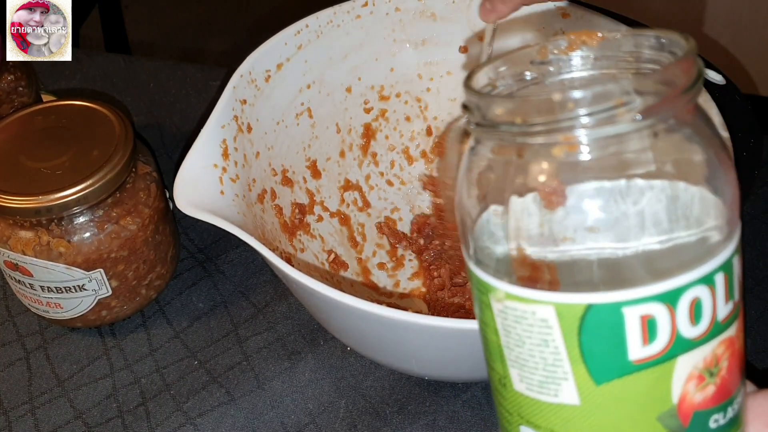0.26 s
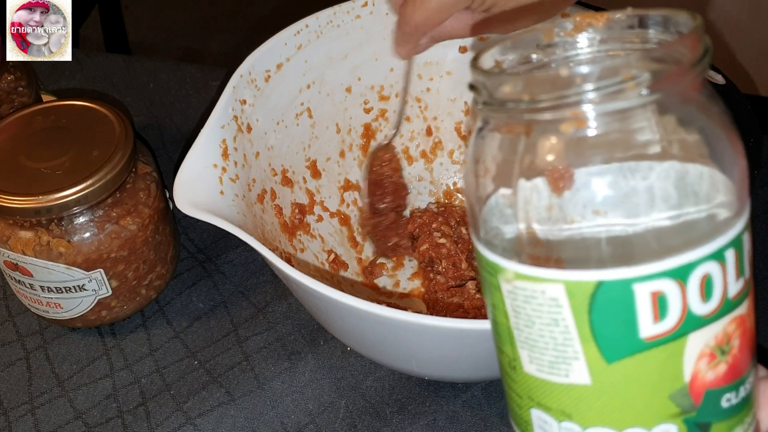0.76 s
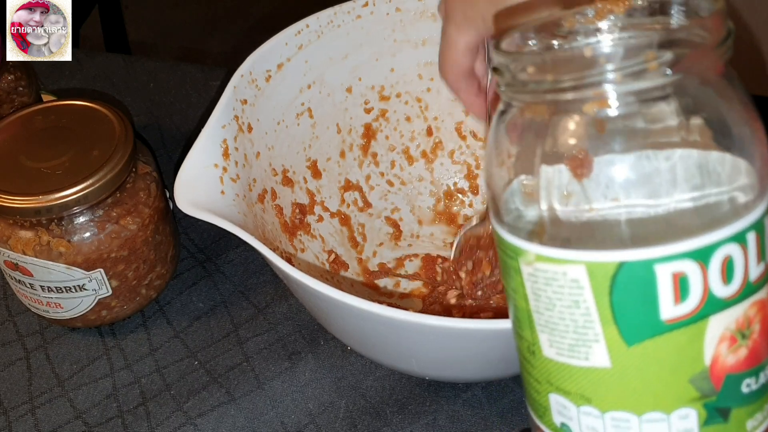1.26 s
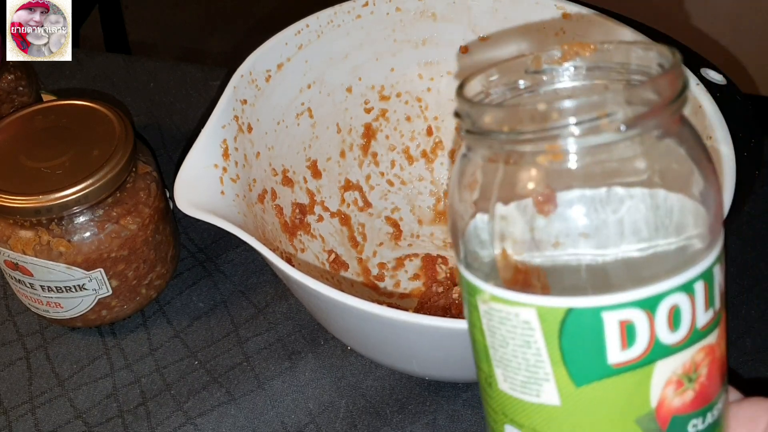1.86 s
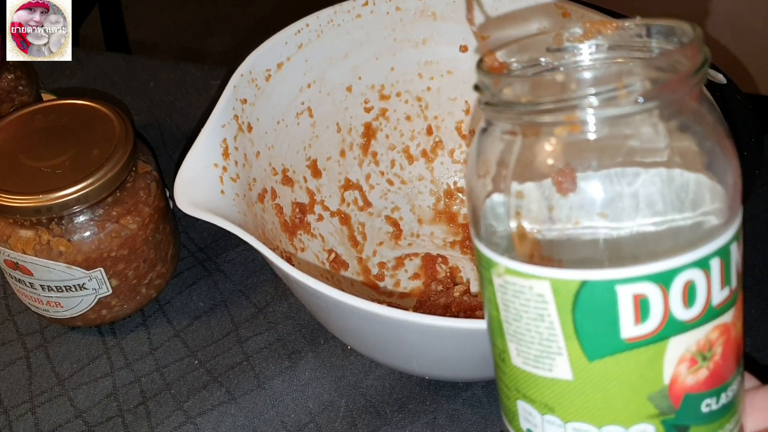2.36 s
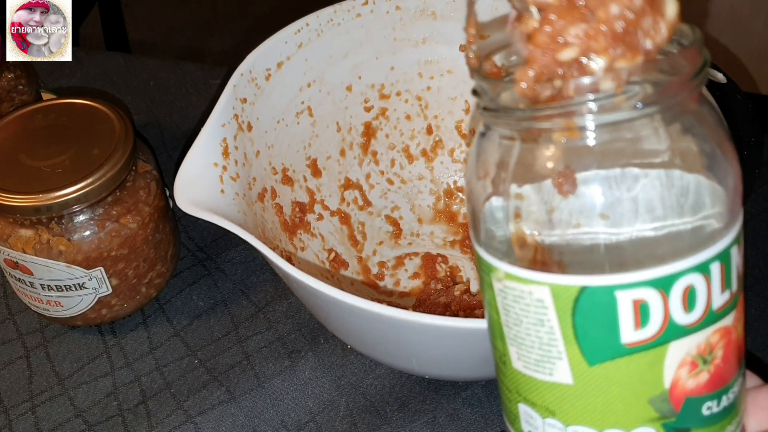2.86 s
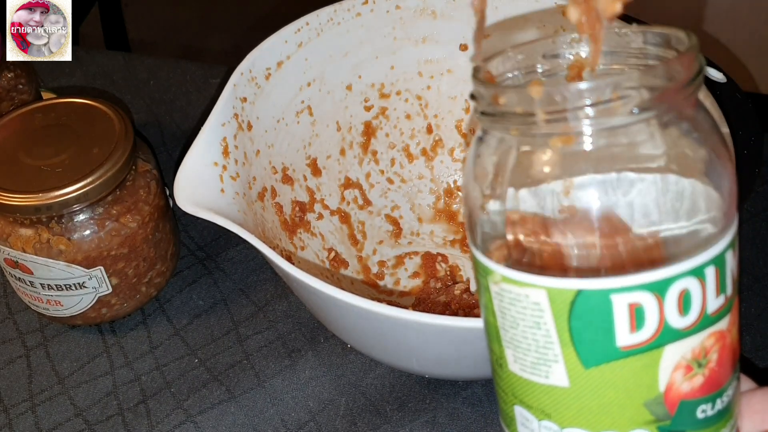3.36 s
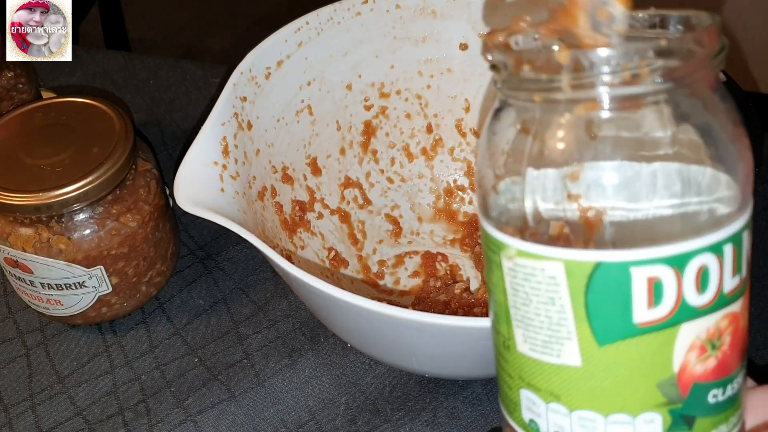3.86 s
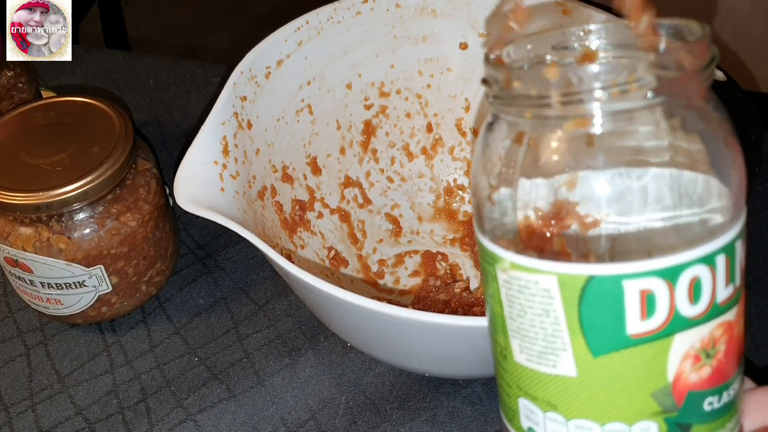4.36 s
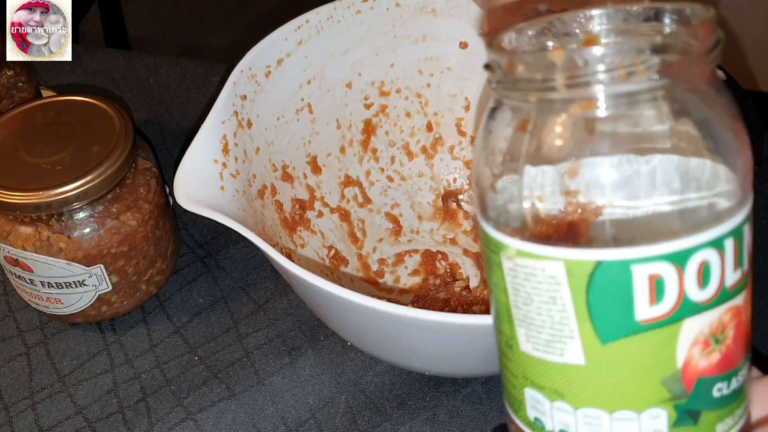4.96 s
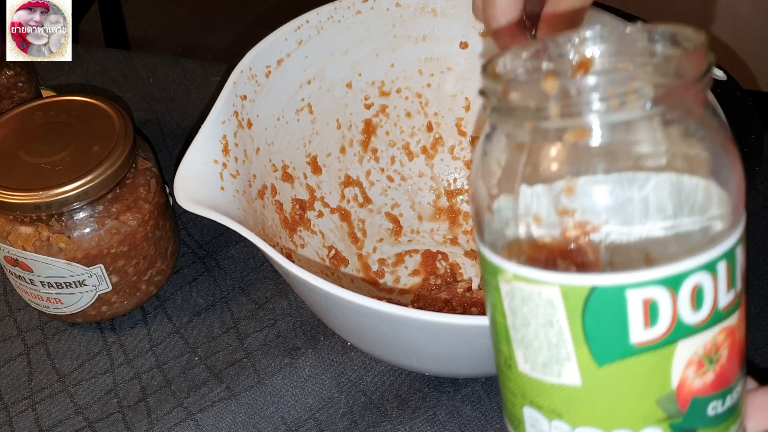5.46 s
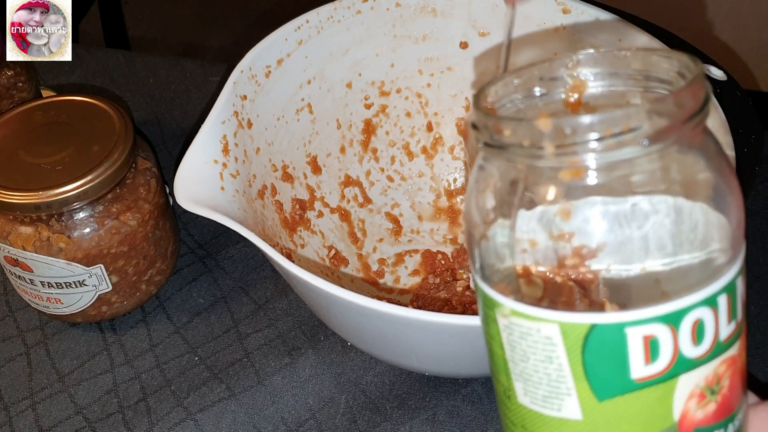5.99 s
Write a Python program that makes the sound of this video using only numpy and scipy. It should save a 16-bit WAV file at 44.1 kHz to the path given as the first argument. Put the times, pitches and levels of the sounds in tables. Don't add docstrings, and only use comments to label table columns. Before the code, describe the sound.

Close up in a small kitchen, faint hiss and low fridge hum continue throughout. A steel spoon barely touches a plastic bowl, then knocks hard and drags through wet sauce with a gritty, hollow scrape and a lighter return. After a quiet gap with tiny wet ticks, two bright clinks ring on a glass jar. Another hard knock and scrape follows, fading into soft touches. A close stereo phone microphone catches a short room echo.

```python
import sys
import numpy as np
from scipy import signal
from scipy.fft import rfft, irfft, next_fast_len
from scipy.io import wavfile
from scipy.ndimage import uniform_filter1d

SR = 44100
rng = np.random.default_rng(int(sys.argv[2]) if len(sys.argv) > 2 else 0)


def pcm_store(signal):
    levels = np.round(np.clip(np.atleast_2d(signal), -1, 1) * 32767)
    wavfile.write(sys.argv[1], SR, levels.astype(np.int16).T)


def to_linear_factor(level_db):
    exponent = np.asarray(level_db, float) / 20
    return 10 ** exponent


N = 274743


def evened(x):
    return x / np.sqrt(np.mean(x ** 2) + 1e-20)


def steady(x):
    return x / np.sqrt(uniform_filter1d((x ** 2).mean(0), 6000) + 1e-20)


def read(points, hz):
    f, value = np.transpose(points)
    return np.interp(np.log(hz + 1), np.log(f + 1), value)


def add(mix, s, sound):
    part = mix[round(s * SR):][:len(sound)]
    part += sound[:len(part)]


def slow(hz, size=16):
    coarse = signal.lfilter(*signal.butter(2, hz, fs=SR / size), rng.standard_normal(N // size + 2))
    return np.repeat(evened(coarse), size)[:N]


def body(x, modes, focus_hz=None, octaves=1., patchy_db=0.):
    out = np.zeros(x.shape)
    focus = None if focus_hz is None else np.log2(focus_hz)
    for k, (hz, width_hz, db) in enumerate(modes):
        near = 1
        if focus is not None:
            near = to_linear_factor(patchy_db * slow(8.4)) / (1 + ((focus - np.log2(hz)) / octaves) ** 2)
        r = np.exp(-np.pi * width_hz / SR)
        top = (-1) ** k * to_linear_factor(db) * np.sqrt(1 - r) * np.array([1, 0, -1])
        bottom = [1, -2 * r * np.cos(2 * np.pi * hz / SR), r * r]
        out += signal.lfilter(top, bottom, x * near)
    return out


def causal(colour, size=2048):
    hz = abs(np.fft.fftfreq(size, 1 / SR))
    log_gain = np.log(to_linear_factor(np.maximum(read(colour, hz), -70)))
    return np.fft.ifft(np.exp(np.conj(signal.hilbert(log_gain)))).real[:size // 2]


def click(colour):
    pulse = causal(colour)
    return pulse / abs(pulse).max()


# pitch_hz, likeness (-1 to 1)
LIKENESS = [(100, 0.5), (300, 1), (600, 0.3), (1100, 0.2), (3000, -0.13), (12000, 0.3)]


def liken(pair):
    size = next_fast_len(pair.shape[1], True)
    a, b = rfft(pair, size)
    same = np.clip(read(LIKENESS, np.fft.rfftfreq(size, 1 / SR)), -1, 1)
    return irfft(np.array([a, same * a + np.sqrt(1 - same ** 2) * b]), size)[:, :pair.shape[1]]


# multiple, level_db (rms)
HUM_ORDERS = [(1, -76), (2, -72), (3, -88.5), (4, -84), (5, -84.5), (6, -91), (10, -100.5), (12, -99),
              (15, -104.5), (16, -95), (18, -95.5)]
# start_s, second_order_db (rms)
LABOUR = [(0.0, -71.5), (0.71, -71), (0.85, -63), (1.3, -65.5), (1.44, -70.5), (1.79, -74), (1.91, -73.5),
          (2.6, -75), (2.88, -71), (3.19, -71.5), (3.38, -73), (4.34, -70), (4.63, -72), (5.0, -67.5),
          (5.73, -73), (6.23, -70)]


def fridge():
    turn_hz, waver_db = 48.9, 1.5
    t = np.arange(N) / SR
    load_db = np.interp(t, *np.transpose(LABOUR)) - HUM_ORDERS[1][1]
    hum = np.zeros(N)
    for k, db in HUM_ORDERS:
        gain = to_linear_factor(db + 3.5 + load_db + waver_db * slow(4.5))
        hum += gain * np.sin(2 * np.pi * (k * turn_hz * t + rng.random()))
    return hum * to_linear_factor(np.array([[-.5], [.5]]))


# middle_s, half_length_s, level_db
GRIPS = [(0.043, 0.34, -71.5), (1.467, 0.17, -80.5), (2.302, 0.15, -88.5), (4.099, 0.3, -78.5),
         (4.441, 0.1378, -72.5), (6.048, 0.17, -70.5)]


def grip(t):
    return sum(to_linear_factor(db) * np.exp(-((t - s) / half_s) ** 2) for s, half_s, db in GRIPS)


# pitch_hz, level_db (per Hz)
AIR = [(18, -40.5), (30, -11), (103, -8.5), (144, -12), (250, -13), (412, -21.5), (880, -22), (1370, -30),
       (2510, -25), (4020, -31), (4830, -29), (7540, -40.5), (8600, -37.5), (9800, -42), (15700, -43.5)]
# pitch_hz, width_hz, level_db
HISS_LIFTS = [(2468, 550, 0), (5010, 390, 6), (8570, 600, 5.5), (12820, 1700, 4.5)]
# start_s, rumble_db
LOAD = [(0, 2.5), (.45, 0.5), (.8, 7), (1.5, 3), (1.9, -2.5), (2.3, 3.5), (2.55, -5.5), (2.9, 4), (3.6, -2),
        (4.2, 6), (5.8, 0), (6.23, 1.5)]
# pitch_hz, width_hz, level_db
HAND = [(320, 6.7, -6), (244, 27, -6)]


def air():
    air_db, rustle_db, still_hiss_db = -75.5, -75, -2.5
    frames, hz = N // 256 + 5, np.fft.rfftfreq(1024, 1 / SR)[:, None]
    a, b, c, d, patches = rng.standard_normal((frames, 513, 5)).T
    patches = evened(uniform_filter1d(uniform_filter1d(patches, 8, 0), 20, 1))
    t = np.arange(frames) * 256 / SR
    bass = 1 / (1 + (hz / 250) ** 4)
    rumble_db = np.interp(t, *np.transpose(LOAD))
    hiss_db = still_hiss_db + 2.0 * np.tanh(grip(t) / to_linear_factor(rustle_db))
    drift_db = bass * rumble_db + (1 - bass) * hiss_db
    lift_db = sum(db / (1 + (2 * (hz - f) / w) ** 2) for f, w, db in HISS_LIFTS)
    gain = to_linear_factor(read(AIR, hz) + lift_db + (1.73 + 1.8 * bass) * patches + drift_db)
    z = np.array([a + 1j * b, c + 1j * d]) * gain
    hiss = to_linear_factor(air_db + 5.5) * evened(signal.istft(z, nperseg=1024, noverlap=768)[1][:, :N])
    hand = grip(np.arange(N) / SR) * evened(body(rng.standard_normal((2, N)), HAND))
    return liken(hiss + hand)


# start_s, pressure_db, speed_db (rasp rel), wall_hz (contact height as favoured mode)
STROKES = [
    [(0.71, -28.5, -0.5, 537), (0.74, -39, -4.5, 610), (0.832, -45, 1.5, 560), (0.894, -41.5, -4, 422),
     (0.912, -33.5, -5, 410), (0.964, -48.5, 2, 512), (1.045, -52, -10.5, 535)],
    [(1.05, -49.5, -3.5, 500), (1.098, -45, -16, 544), (1.128, -65, 1, 533), (1.155, -47, -3, 530),
     (1.187, -42.5, -12.5, 503), (1.249, -65, -13, 500), (1.281, -61, -6, 545), (1.335, -78, 6, 570)],
    [(4.849, -29, -2, 497), (4.867, -47, 1.5, 510), (4.927, -47, 1, 630), (4.981, -46.5, 4.5, 483),
     (5.059, -65, -11, 525), (5.095, -57, 1, 464)],
    [(5.102, -55, -3.5, 530), (5.184, -51, -5, 547), (5.214, -53.5, 1, 497), (5.232, -43.5, -16, 456),
     (5.27, -66, 8.5, 510), (5.33, -53, 0, 494), (5.4, -56.5, 0.5, 455), (5.49, -97, -11, 416)],
]
# rim_start_hz, rim_end_hz, sauce_start_db, sauce_end_db, wall_spread_octaves
TRAVEL = [(2200, 1900, -2, -19, 1), (1300, 1850, -7, -23, 0.29), (1880, 1320, -11.5, -8.5, 0.66),
          (1530, 1900, -9.5, -14, 0.22)]
# start_s, length_s, pressure_db, speed_db, wall_hz
TOUCHES = [(0.048, 0.22, -69.5, -4, 400), (0.422, 0.079, -70.5, -5, 325), (1.357, 0.18, -64, -8, 320),
           (3.582, 0.097, -70.5, -18, 313.4), (4.734, 0.11, -76, 4, 321), (4.818, 0.029, -59, 0.5, 329),
           (5.556, 0.076, -59, -11, 474), (5.985, .12, -68, 2.5, 349), (6.164, 0.25, -69.5, -12, 330)]
# start_s, level_db, t60_s
ROCKS = [(0.44, -62.5, 0.15), (0.71, -30, 0.2), (1.05, -58, 0.55), (4.811, -36, 0.11), (4.847, -42, 0.23),
         (5.561, -46, 0.11), (5.614, -52, 0.13), (5.999, -67, 0.32)]


def contact():
    attack_s, release_s = 0.0041, .0049
    weight_db = -19
    touch_rise_s, touch_start_db, touch_fall_db = .012, -10, -13.5
    touch_rim_hz, touch_wet_db, touch_octaves = 2030, -9, 0.43
    t = np.arange(N) / SR
    gains, places = np.zeros((4, N)), []
    touches = [[(s, db + touch_start_db, speed_db, hz),
                (s + touch_rise_s, db, speed_db, hz),
                (s + length, db + touch_fall_db, speed_db, hz)] for s, length, db, speed_db, hz in TOUCHES]
    still = (touch_rim_hz, touch_rim_hz, touch_wet_db, touch_wet_db, touch_octaves)
    travel = TRAVEL + [still] * len(touches)
    for rows, (rim0_hz, rim1_hz, wet0_db, wet1_db, octaves) in zip(STROKES + touches, travel):
        s, press_db, speed_db, wall_hz = np.transpose(rows)
        way = (s - s[0]) / (s[-1] - s[0])
        rim_hz = rim0_hz + (rim1_hz - rim0_hz) * way
        wet_db = wet0_db + (wet1_db - wet0_db) * way
        places += list(zip(s, wall_hz, rim_hz, octaves + 0 * s))
        fade = np.clip(np.minimum((t - s[0]) / attack_s, (s[-1] - t) / release_s), 0, 1)
        rel_db = [weight_db + 0 * s, 0 * s, speed_db, speed_db + wet_db]
        gains += np.array([to_linear_factor(np.interp(t, s, press_db + db)) * fade for db in rel_db])
    for s, db, t60 in ROCKS:
        gains[0] += np.clip((t - s) / attack_s, 0, 1) * to_linear_factor(db - 60 * abs(t - s) / t60)
    s, *place = np.transpose(sorted(places))
    return gains, *(np.interp(t, s, p) for p in place)


# pitch_hz, width_hz, level_db
THUMP = [(101, 34, 1.5), (126, 20, 2.5), (174, 20, -11)]
# pitch_hz, width_hz, level_db
WALL = [(222.7, 2.5, -4), (276.6, 23, -1.5), (321, 21, -0.5), (437, 24, -3), (495.2, 45, 0),
        (556.3, 34, -1), (626.6, 13, -1.5), (692, 57, 2.5)]
# pitch_hz, width_hz, level_db
RIM = [(898, 120, 1), (1182, 150, 2.5), (1555, 230, -1), (1950, 200, 0), (2265, 160, 0), (2632, 350, 0),
       (3100, 98, -10.5)]
# pitch_hz, level_db (per Hz)
FIZZ = [(1940, -33.5), (3300, -1.5), (3480, 0), (4040, -5), (4720, -9), (6850, -13.5), (7860, -22),
        (9940, -20.5), (12600, -31.5), (15700, -40)]


def scrape(slip_db=1.6, grit_db=3.0):
    def band(low_hz, high_hz, x):
        return signal.lfilter(*signal.butter(2, [low_hz, high_hz], "band", fs=SR), x)

    drive = liken(rng.standard_normal((2, N))) * to_linear_factor(slip_db * slow(110) + grit_db * slow(600))
    gains, wall_hz, rim_hz, octaves = contact()
    rocking = drive[0] + .35 * (drive - drive[0])
    thump = band(85, 260, body(rocking, THUMP))
    wall = band(200, 900, body(drive, WALL, wall_hz, octaves, patchy_db=2.0))
    rim = band(700, 4000, body(drive, RIM, rim_hz, 0.76, patchy_db=3.5))
    fizz = signal.oaconvolve(drive, click(FIZZ)[None])[:, :N]
    return sum(g * steady(x) for g, x in zip(gains, [thump, wall, rim, fizz]))


# start_s, level_db (peak), pitch_hz, left_right_db
TICKS = [(0.0698, -52, 5840, 16), (0.3344, -91, 5130, 0), (1.0614, -42, 4830, 3), (1.2765, -51, 9100, 10),
         (1.345, -62, 14480, 0), (1.282, -51, 10200, 0), (1.38, -52, 13600, 5), (2.439, -80.5, 4690, -1.5),
         (3.2425, -50, 5360, 3.5), (3.3217, -75.5, 4000, -3), (3.3568, -57.5, 5250, 1.5),
         (3.4166, -56.5, 5480, -3), (2.0612, -76.5, 15560, 4.5), (3.0669, -63.5, 13750, 0),
         (3.1338, -58, 12560, 1.5)]


def ticks():
    out, t = np.zeros((2, N)), np.arange(300) / SR
    for s, db, hz, pan_db in TICKS:
        rise = 1 - np.exp(-(t * hz / 0.7) ** 2)
        tick = np.sin(2 * np.pi * hz * t) * np.exp(-t * hz / 1.93) * rise
        for c, sign in enumerate((.5, -.5)):
            add(out[c], s, to_linear_factor(db + sign * pan_db) * tick)
    return out


# start_s, ring_db (peak), wall_db (rel), thump_db (rel), crack_db (rel)
KNOCKS = [(0.709, -16.5, -10.5, -20.5, 5.5), (1.051, -44, 5, -19, -9), (1.1557, -45, 1, -20, -9),
          (4.736, -60.5, -24.5, -33, 14), (4.812, -46, -31, -6.5, 5), (4.8491, -16, -17, -29.5, -7),
          (5.1032, -38.5, -17, -26, -11), (5.5615, -53.5, -1, -1.5, -16.5),
          (5.9956, -48.5, -20.5, -31, -14.5)]
# pitch_hz, level_db (per Hz)
CRACK = [(470, -39), (800, -8.5), (1220, -12.5), (2280, -4), (3480, -4), (5050, -3), (5800, -9), (6730, -7),
         (8320, -22), (9780, -21.5), (11600, -35), (13200, -23), (15700, -35.5)]


def knocks():
    ring_hz, hard_hz, dull_db_per_octave = 2080, 15800, 14.5
    out, t = np.zeros(N), np.arange(6000) / SR
    blow = signal.unit_impulse(len(t))
    wall = signal.lfilter(*signal.butter(2, 446, "high", fs=SR), body(blow, WALL))
    thump = body(blow, THUMP)
    wall, thump = wall / abs(wall).max(), thump / abs(thump).max()
    ring = np.sin(2 * np.pi * ring_hz * t) * to_linear_factor(-60 * t / .005) * np.minimum(t / .0003, 1)
    for s, db, wall_db, thump_db, crack_db in KNOCKS:
        add(out, s + .0011, -to_linear_factor(db) * (ring + to_linear_factor(wall_db) * wall + to_linear_factor(thump_db) * thump))
        edge_hz = np.clip(hard_hz * 2 ** ((db + 17.0) / dull_db_per_octave), 3000, 20000)
        crack = signal.lfilter(*signal.butter(2, edge_hz, fs=SR), click(CRACK))
        add(out, s + 0.0009, -to_linear_factor(db + crack_db) * crack)
    return out


# start_s, length_s, level_db, pitch_hz, width_hz
SLICKS = [(0.71, 0.2, -58, 8500, 9000), (1.02, 0.08, -49.5, 330, 110), (1.276, 0.26, -78, 9100, 2500),
          (4.852, 0.057, -45.5, 1920, 600), (5.56, .08, -82, 8400, 6000), (3.1, .08, -83, 8700, 1500),
          (1.344, 0.11, -85.5, 13400, 3300), (1.396, 0.22, -74.5, 2530, 510),
          (2.45, 0.084, -79.5, 2130, 570), (4.905, 0.19, -68.5, 9500, 6800), (5.272, 0.21, -56.5, 309, 61),
          (5.285, 0.078, -55, 3640, 590), (5.37, .04, -63, 2060, 990), (5.562, 0.035, -73.5, 2900, 180),
          (.87, 0.13, -53, 3730, 1100), (5.305, 0.032, -54.5, 1230, 360), (4.95, 0.091, -55, 3900, 710),
          (6.0, 0.27, -77, 2530, 300), (1.2, 0.16, -71.5, 2550, 230), (1.25, 0.3, -80, 4980, 730),
          (5.101, 0.14, -50.5, 1670, 830), (.713, 0.11, -39.5, 2000, 498), (5.562, 0.079, -71, 2020, 250)]


def smears():
    out = np.zeros((2, N))
    for s, length, db, hz, width_hz in SLICKS:
        way = np.arange(0, min(length, 1 / 3), 1 / SR)[:SR // 3] / length
        mode = [(hz, width_hz, 0)]
        hiss = evened(body(body(rng.standard_normal((2, SR // 3)), mode), mode))[:, :len(way)]
        for c in range(2):
            add(out[c], s, to_linear_factor(db - 2.3 * way) * np.sin(np.pi * way ** 0.33) * hiss[c])
    return out


# pitch_hz, level_db, t60_s
BOWL = [(121, -1, .09), (152, -9, 0.13), (304, -5, 0.13), (427, -4.5, 0.11), (503, 1.5, 0.18), (560, 0, .2),
        (633, -2.5, 0.22)]
# start_s, level_db (peak), favoured_hz, t60_share
CATCHES = [(0.7105, -22, 560, 0.47), (0.787, -34, 560, 0.33), (0.809, -33, 560, 0.42),
           (0.837, -39.5, 560, .5), (0.906, -30.5, 400, 1.25), (1.05, -48, 640, .5),
           (1.157, -42, 516, 0.32), (1.177, -34.5, 520, 0.47), (4.85, -33.5, 560, 0.31),
           (4.984, -40.5, 500, 0.26), (5.217, -45.5, 520, 0.96), (5.289, -53, 505, 0.65),
           (5.382, -54, 486, 0.6), (5.561, -50.5, 498, 0.44), (5.562, -51.5, 152, 1.3)]


def catches():
    spread_octaves, rise_s = .35, 0.0026
    out, t = np.zeros(N), np.arange(SR // 3) / SR
    for s, db, near_hz, damp in CATCHES:
        ring = np.zeros(len(t))
        for k, (hz, mode_db, t60) in enumerate(BOWL):
            decay = to_linear_factor(mode_db - 60 * t / (np.clip(t60, .04, .4) * damp))
            near = 1 / (1 + (np.log2(hz / near_hz) / spread_octaves) ** 2)
            ring += (-1) ** k * decay * np.sin(2 * np.pi * hz * t) * near
        add(out, s, to_linear_factor(db) * ring / abs(ring).max() * np.minimum(t / rise_s, 1))
    return out


# start_s, length_s, level_db (peak), pitch_hz
SINGS = [(1.235, 0.087, -55, 555), (1.207, .02, -42, 545), (5.165, 0.028, -49.5, 530),
         (.723, .02, -26, 600), (.742, .025, -29.5, 610), (.715, .09, -37.5, 126), (.9, 0.034, -36.5, 400),
         (.935, .025, -40, 480), (1.09, 0.02, -47.5, 565), (5.11, .05, -53, 500), (5.29, 0.046, -53.5, 500),
         (5.37, 0.047, -56, 480), (4.815, .12, -56, 55.4), (5.57, .12, -63, 59), (5.56, .12, -60, 240)]


def sings():
    out = np.zeros(N)
    for s, length, db, hz in SINGS:
        t = np.arange(0, length, 1 / SR)
        add(out, s, to_linear_factor(db) * np.sin(np.pi * t / length) * np.sin(2 * np.pi * hz * t))
    return out


# start_s, level_db (peak), pitch_hz
SLIPS = [(0.7343, -30.5, 1810), (0.7514, -28, 1920), (0.7644, -35, 1920), (0.7894, -36, 2270),
         (0.818, -29, 2460), (0.8616, -38, 2580), (0.896, -37, 2660), (0.9273, -33, 2170),
         (0.9464, -29, 2250), (0.9744, -37, 2160), (1.0295, -41, 1180), (1.0541, -45, 1150),
         (1.0782, -43, 1000), (1.1552, -41, 1080), (1.1794, -45, 1110), (1.2094, -50, 2160),
         (4.9191, -36, 2120), (4.958, -35, 1170), (4.9751, -36, 1150), (5.1037, -44, 2140),
         (5.128, -40, 1215), (5.1494, -42, 2070), (5.1714, -47, 1700), (5.2039, -47, 1210),
         (5.216, -40, 1230), (5.2743, -50, 1940), (5.2887, -47, 1950), (5.2987, -43, 2020),
         (5.3126, -40, 1210), (5.3232, -39, 1580), (5.3599, -48, 1170), (5.3754, -45, 3400),
         (5.3835, -42, 1950)]


def slips():
    out, t = np.zeros(N), np.arange(4000) / SR
    for s, db, hz in SLIPS:
        decay = to_linear_factor(db - 7 - 60 * t * hz / 26)
        add(out, s, decay * np.sin(2 * np.pi * hz * t) * np.minimum(t / .0006, 1))
    return out


# start_s, level_db (peak), crack_db (rel), facing (jar towards one port, 0-1), contact_s
CLINKS = [
    (3.9999, -28.5, -0.5, 0.98, 0.0032),
    (4.0663, -23, 3, 0.63, 0.00061),
]
# pitch_hz, level_db, t60_s, left_right_db
JAR_MODES = [(2831, 4.5, .062, -20), (2866, -14, .07, -10), (2920, -16, .05, 6), (4630, -13, .07, 6),
             (4720, -10, .05, 7), (4805, -6, .14, 2), (4890, -18, .07, 0),
             (497, -24, 0.16, -16), (560, -16, 0.094, -10.5), (1265, -10.5, 0.03, 13.5),
         (1620, -17.5, 0.081, 0.5), (3060, -9, 0.085, -13.5), (3170, -15.5, 0.11, -7),
         (3600, -19, 0.13, -7), (4060, -16, 0.052, 10.5), (4345, -22, 0.12, 4), (4553, -11.5, 0.091, -4),
         (10200, -12, 0.032, -16.5), (10350, -13.5, 0.031, -15), (10230, -25.5, 0.22, -5.5),
         (10420, -27, .15, 1)]
# pitch_hz, level_db (per Hz)
SPLASH = [(400, -8), (1000, -3), (2200, -1.5), (3300, -2), (4500, -4.5), (5300, -7), (7000, -16.5),
          (10000, -16), (15700, -22.5)]
# pitch_hz, level_db (per Hz)
CLINK_CRACK = [(100, -27), (300, -5.5), (1200, 2.5), (2000, 0.5), (3800, -24.5), (4700, 3), (5400, -26),
               (6800, -15), (8100, -24), (10300, -12), (12500, -30.5), (15700, -51)]
# delay_s, level_db
WALL_ECHOES = [(.0322, -11.5), (.065, -25), (.098, -34)]


def clinks():
    splash_db, splash_t60_s = -17, 0.27
    out, t = np.zeros((2, N)), np.arange(SR // 2) / SR
    for s, db, crack_db, facing, contact_s in CLINKS:
        for c, sign in enumerate((.5, -.5)):
            ring = np.zeros(len(t))
            for hz, mode_db, t60, pan_db in JAR_MODES:
                ring += to_linear_factor(mode_db + sign * facing * pan_db - 60 * t / t60) * np.sin(2 * np.pi * hz * t)
            splash = signal.oaconvolve(rng.standard_normal(len(t)), causal(SPLASH))[:len(t)]
            ring += to_linear_factor(splash_db - 60 * t / splash_t60_s) * evened(splash)
            ring *= np.minimum(t / contact_s, 1)
            add(out[c], s, to_linear_factor(db - 6.5) * ring)
            add(out[c], s, to_linear_factor(db + crack_db) * click(CLINK_CRACK))
            spread = ring * np.minimum(t / .005, 1)
            for port in range(2):
                for late_s, echo_db in WALL_ECHOES:
                    add(out[port], s + late_s, to_linear_factor(db - 8.0 + echo_db) * spread)
    return out


# delay_s, level_db
ECHOES = [(.0005, 0.5), (.0012, -9.5), (.0022, -16), (.0065, -18.5)]


def ports(x, lag_s):
    taps = np.zeros((2, 2048))
    taps[0, 0] = taps[1, round(lag_s * SR)] = 1
    for (s, db), skew in zip(ECHOES, rng.integers(0, 12, (len(ECHOES), 2))):
        taps[[0, 1], round(s * SR) + skew] += to_linear_factor(db)
    return signal.oaconvolve(x * np.ones((2, 1)), taps, axes=1)[:, :N]


# pitch_hz, t60_s
KITCHEN = [(100, 0.51), (500, 0.27), (2000, 0.31), (5000, 0.39), (12000, 0.21)]


def room(x):
    taps = np.zeros((2, SR // 2))
    at = np.arange(130, SR // 2 - 20, 20) + rng.integers(0, 20, (2, (SR // 2 - 131) // 20))
    np.put_along_axis(taps, at, rng.choice([-1., 1.], at.shape), 1)
    hz, t, z = signal.stft(liken(taps), SR, nperseg=256)
    t60 = np.maximum(read(KITCHEN, hz), .05)[:, None]
    tail = signal.istft(z * to_linear_factor(-60 * t / t60), SR, nperseg=256)[1]
    return signal.fftconvolve(x[None], tail / np.linalg.norm(tail[0]), axes=1)[:, :N]


def scene():
    hum, hiss = fridge(), air() * to_linear_factor(np.array([[-1.2], [1.2]]))
    rub, drips = scrape(), ticks()
    hits = knocks() + catches() + sings() + slips()
    jar = clinks()
    near = to_linear_factor(-2.0) * rub + ports(hits, .0001) + jar + drips + smears()
    far = room(to_linear_factor(-6) * rub[0] + to_linear_factor(-6.0) * hits + to_linear_factor(-16) * jar.mean(0) + to_linear_factor(1.0) * drips.mean(0))
    return near + far + hum + hiss


def band_limit(x):
    return signal.sosfilt(signal.butter(12, 15740, fs=SR, output="sos"), x)


# pitch_hz, left_right_db
MIC_SIDE = [(200, 0), (700, 1), (2000, 1), (4500, 4), (5500, 2), (7000, 7), (8000, 2), (8800, -5),
            (11000, -1), (14000, 3)]


def record(dry):
    colour = np.array([causal([(hz, sign * db) for hz, db in MIC_SIDE]) for sign in (.5, -.5)])
    coloured = signal.oaconvolve(dry, colour, axes=1)[:, :N]
    mix = signal.lfilter(*signal.butter(3, 40, "high", fs=SR), coloured)
    return band_limit(mix)


dry = scene()
out = record(dry)
pcm_store(out)
```